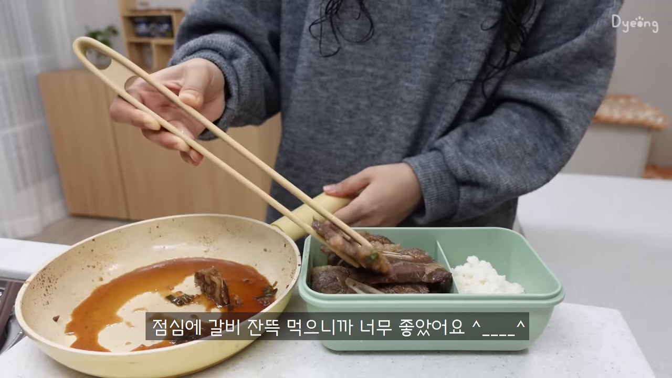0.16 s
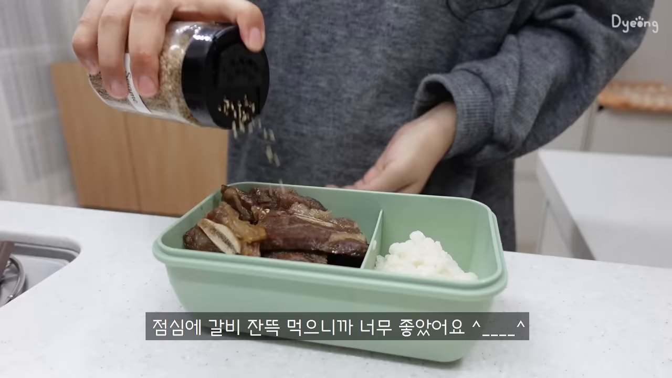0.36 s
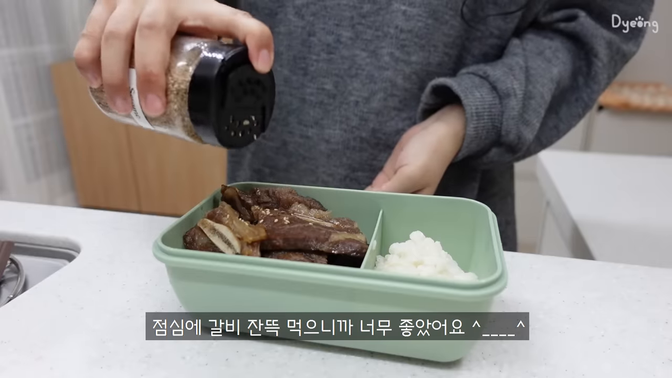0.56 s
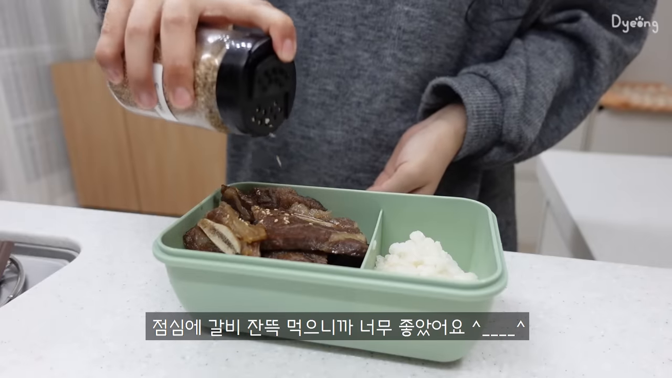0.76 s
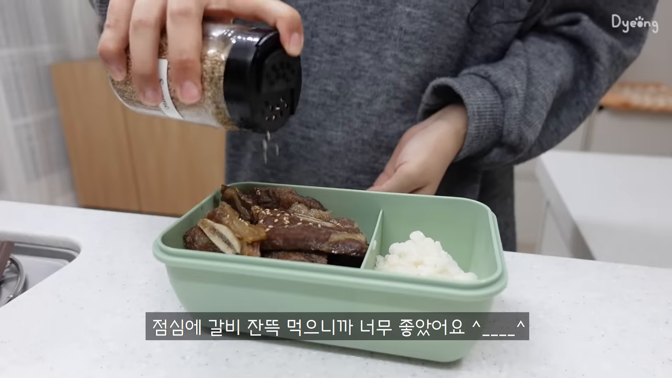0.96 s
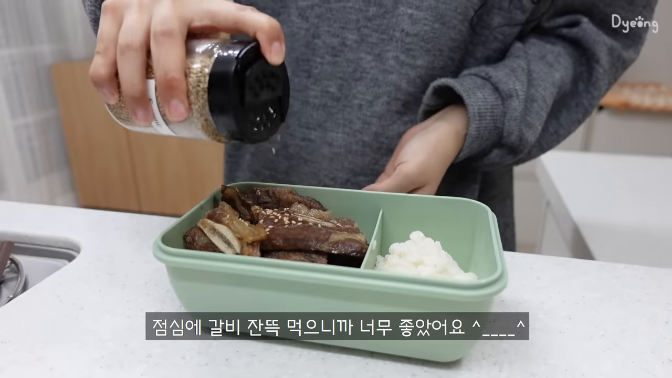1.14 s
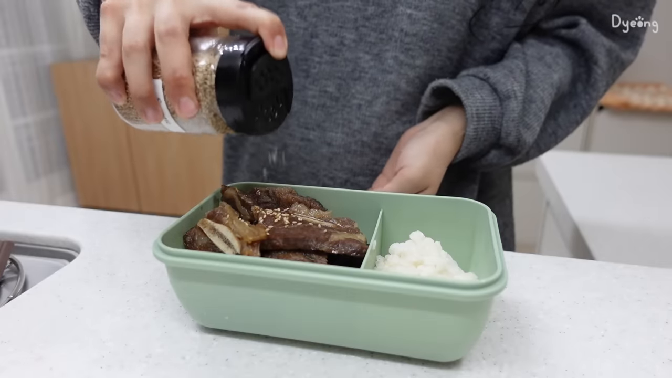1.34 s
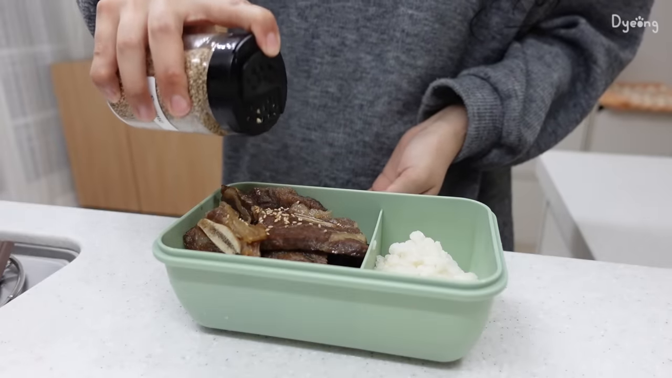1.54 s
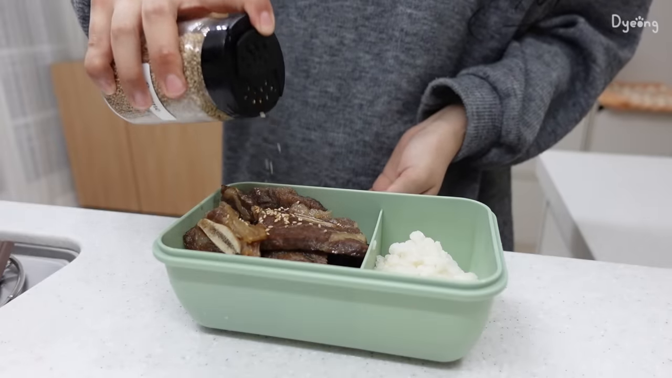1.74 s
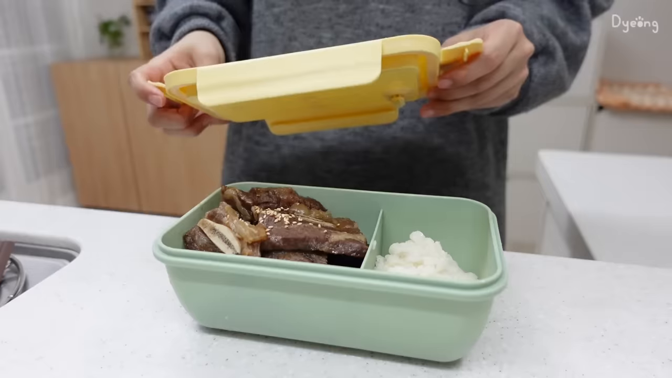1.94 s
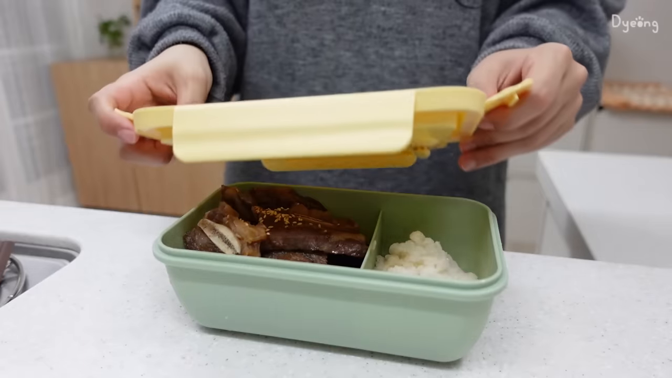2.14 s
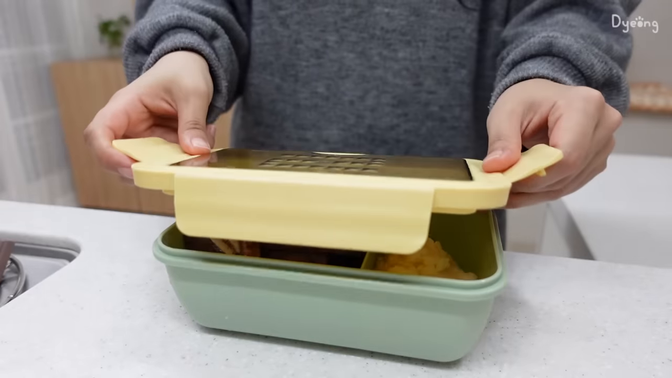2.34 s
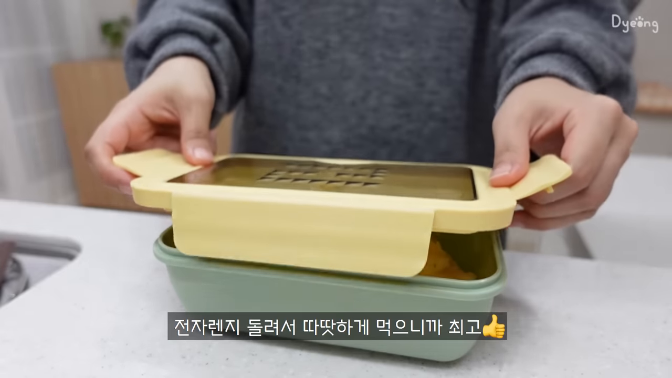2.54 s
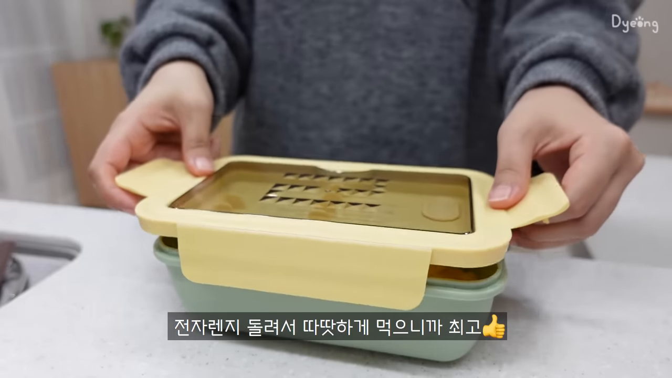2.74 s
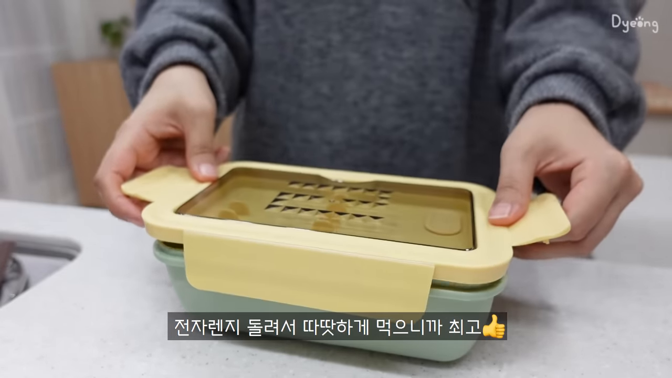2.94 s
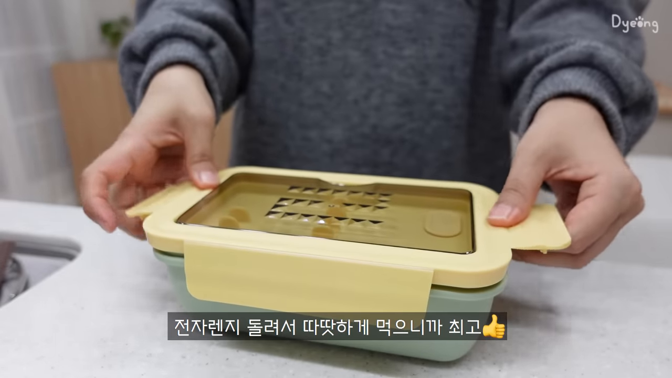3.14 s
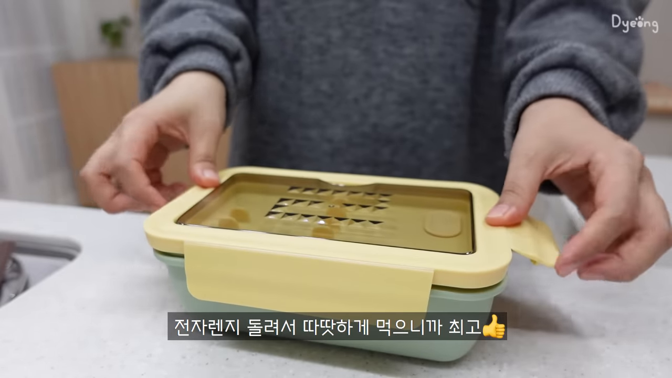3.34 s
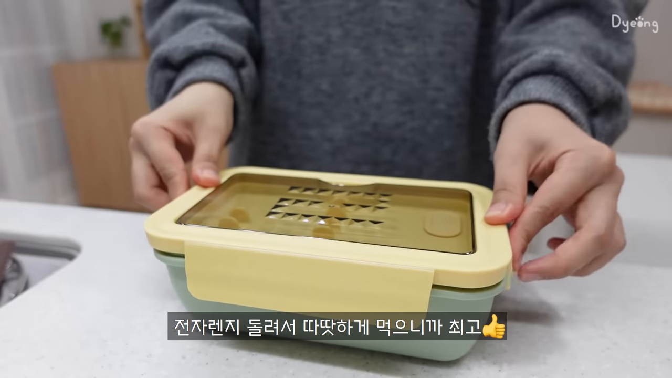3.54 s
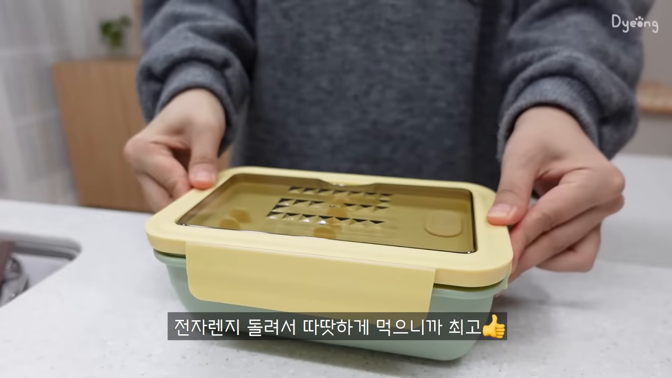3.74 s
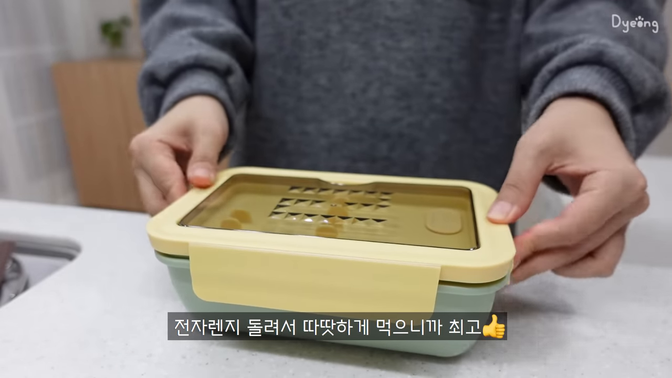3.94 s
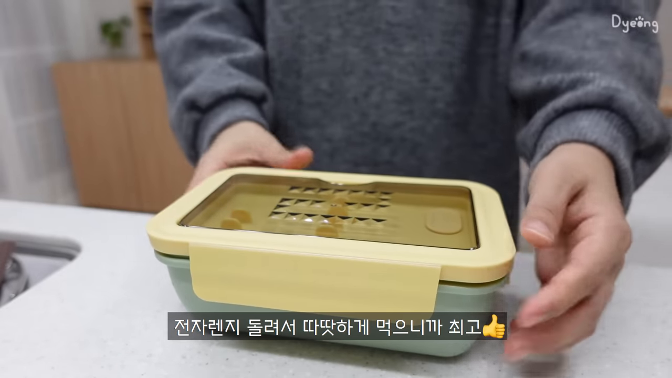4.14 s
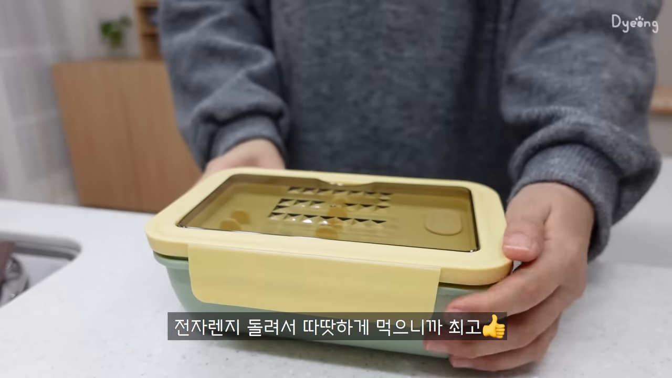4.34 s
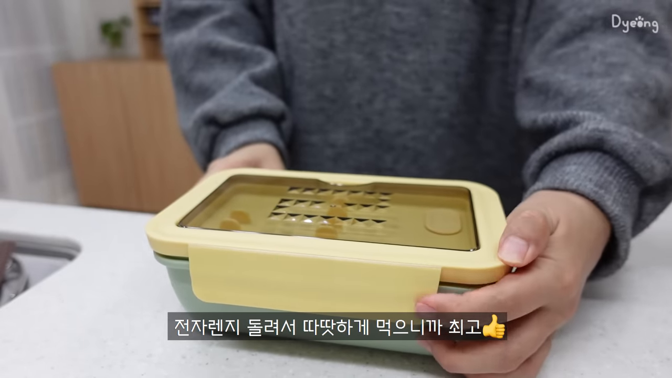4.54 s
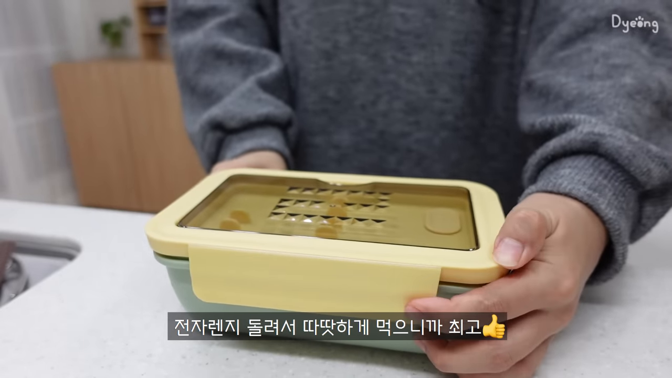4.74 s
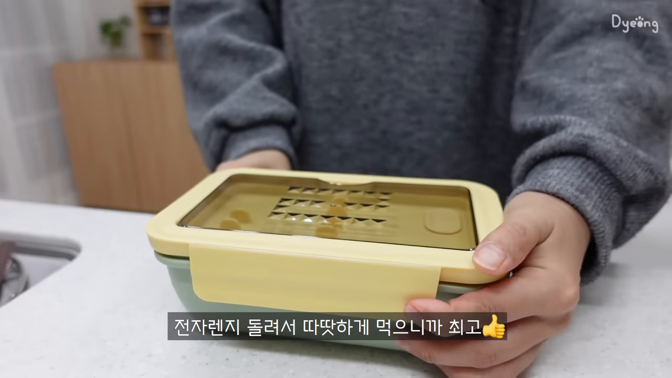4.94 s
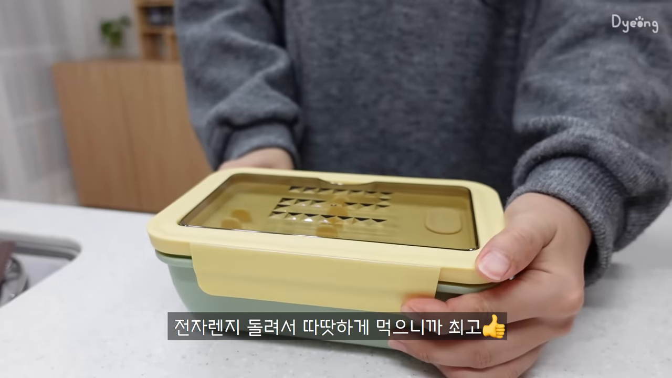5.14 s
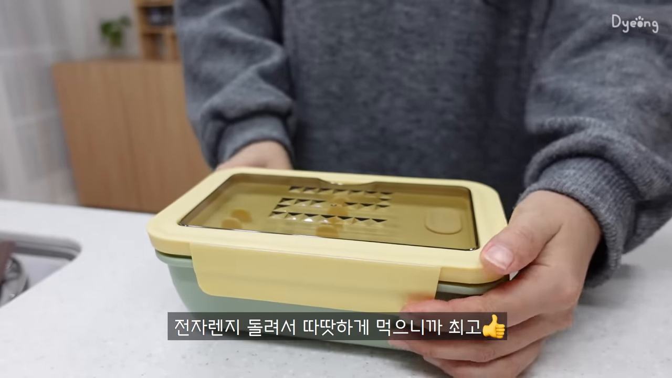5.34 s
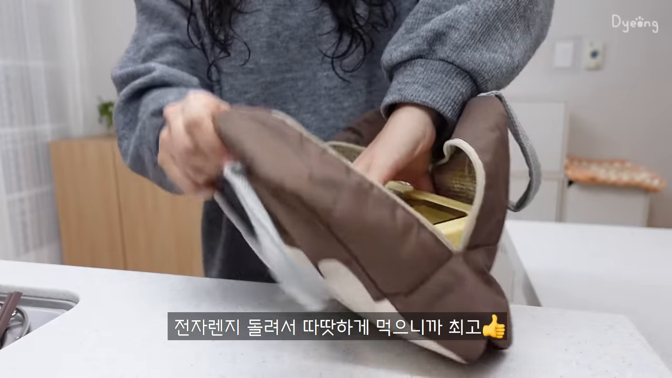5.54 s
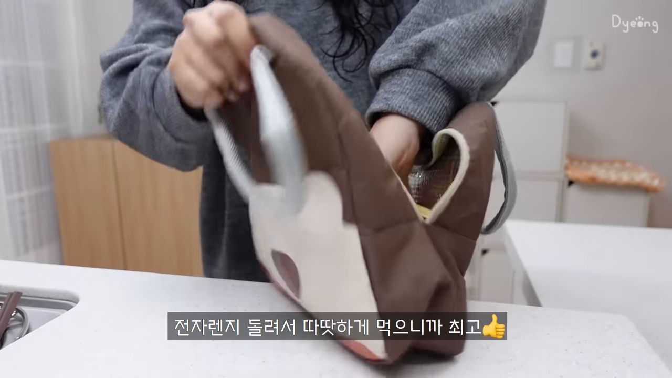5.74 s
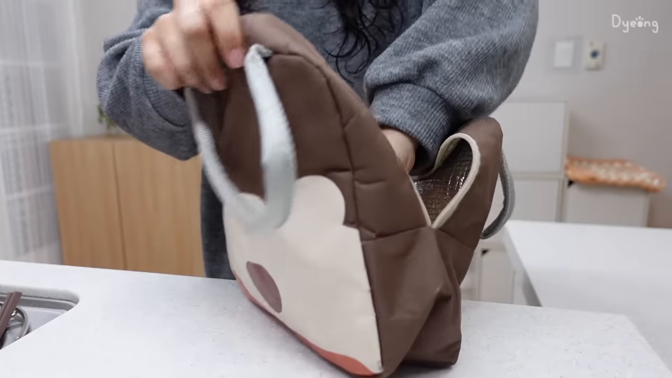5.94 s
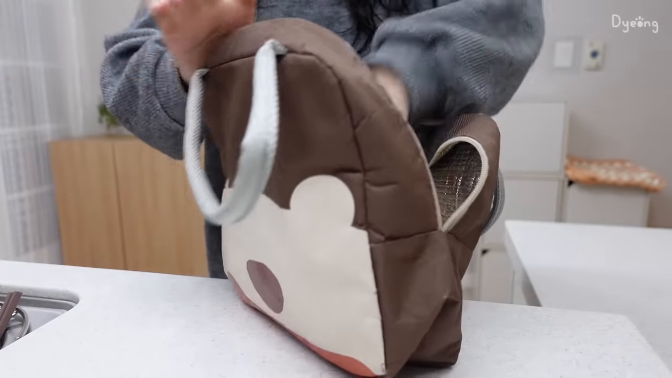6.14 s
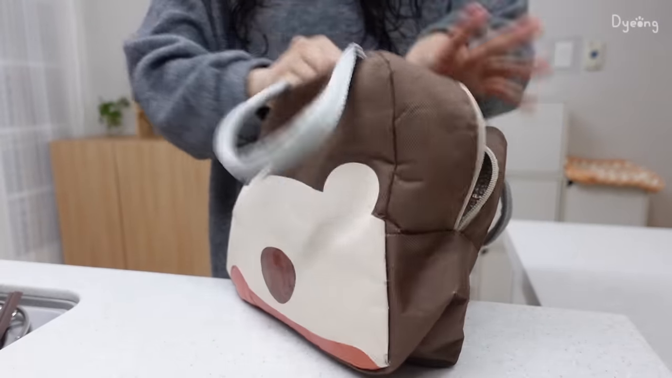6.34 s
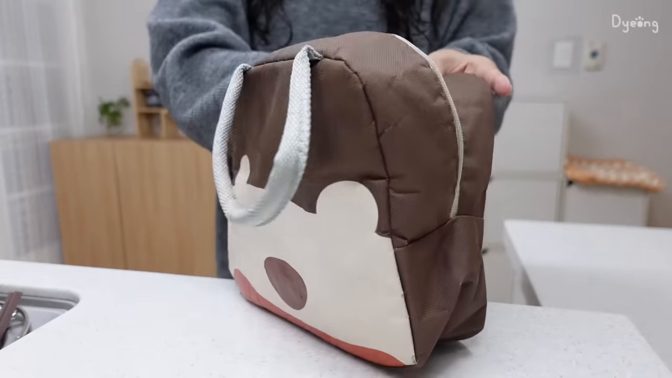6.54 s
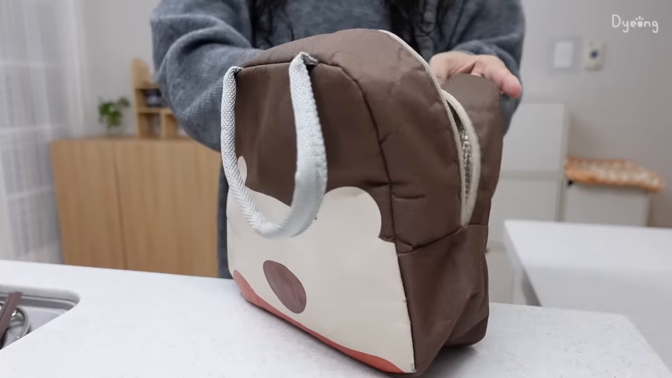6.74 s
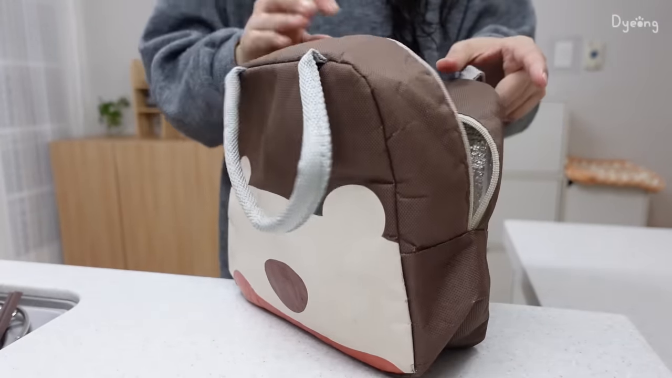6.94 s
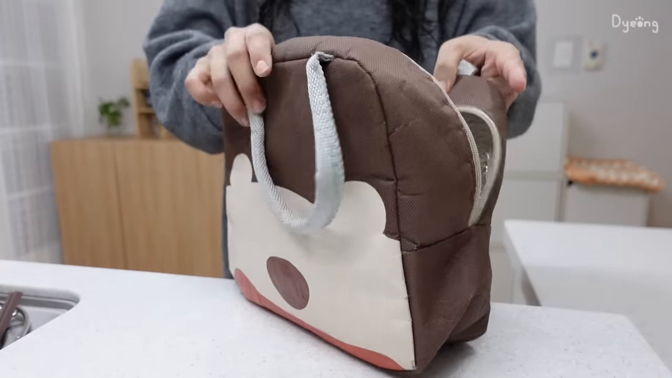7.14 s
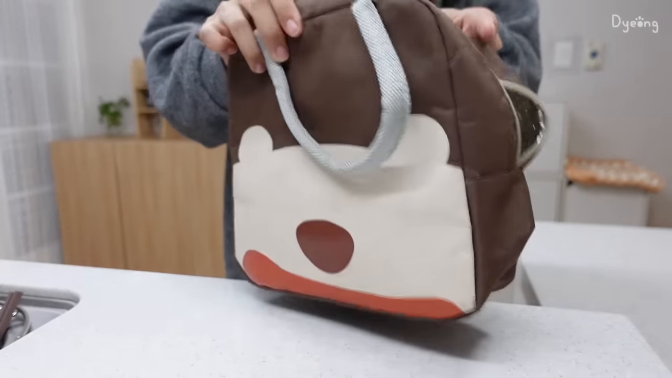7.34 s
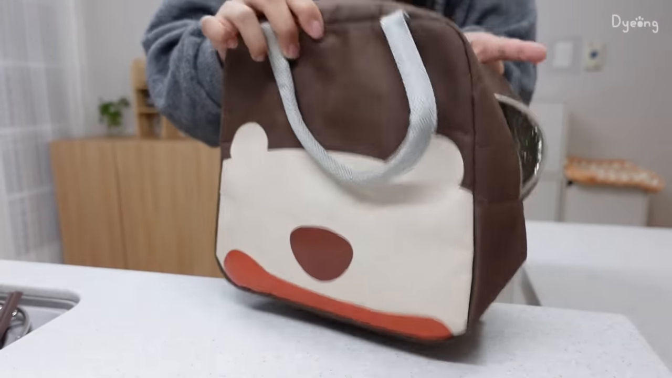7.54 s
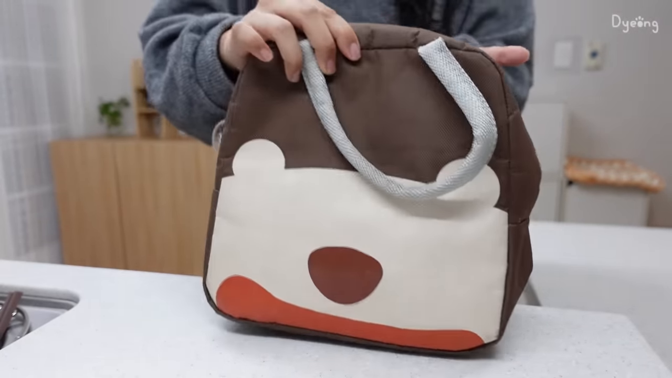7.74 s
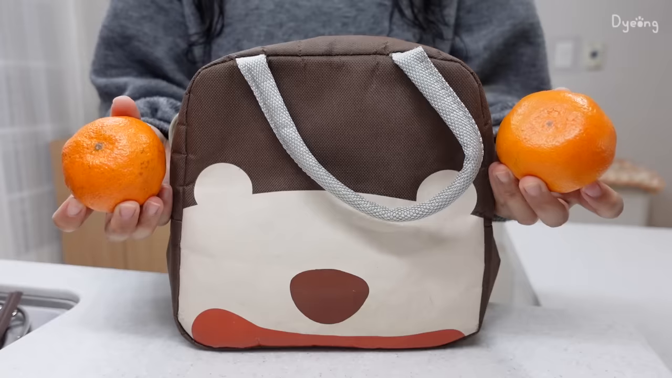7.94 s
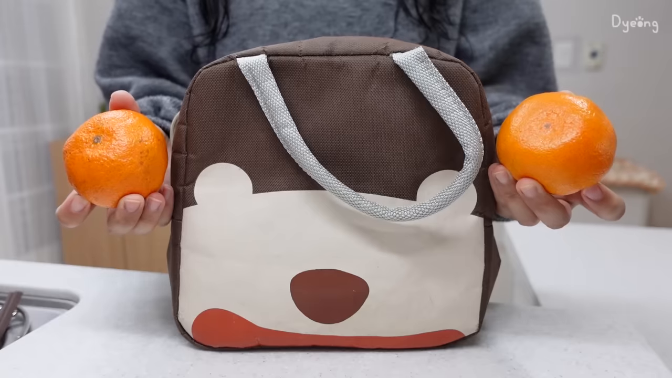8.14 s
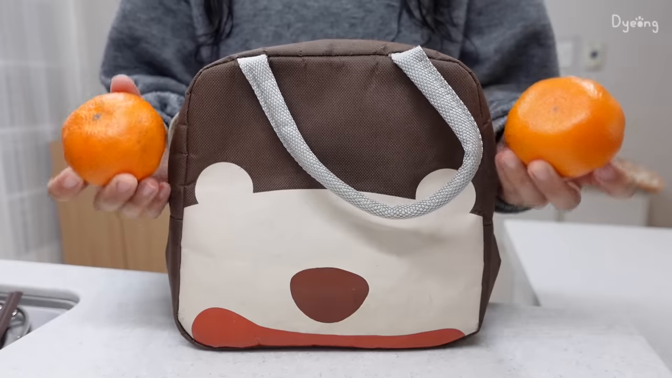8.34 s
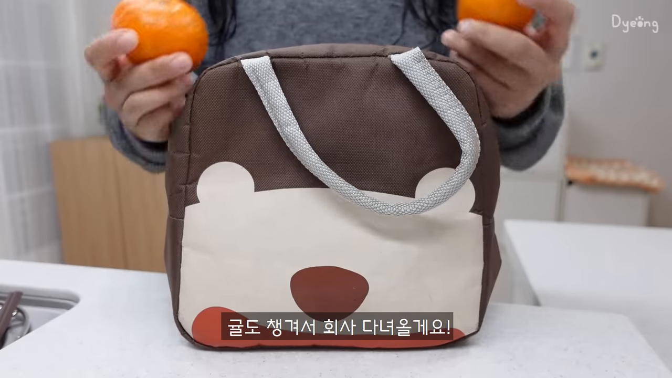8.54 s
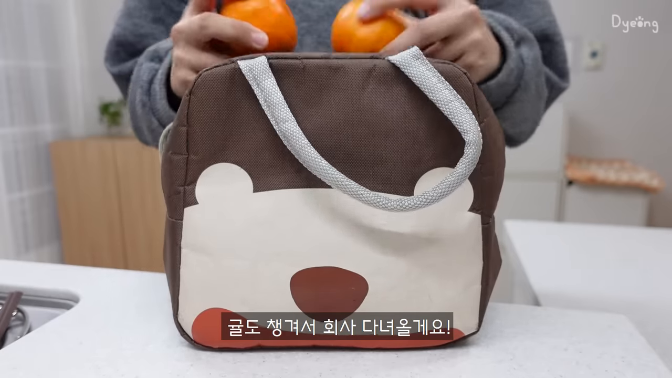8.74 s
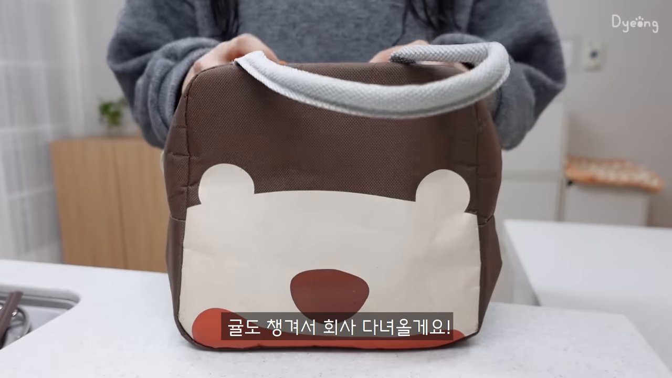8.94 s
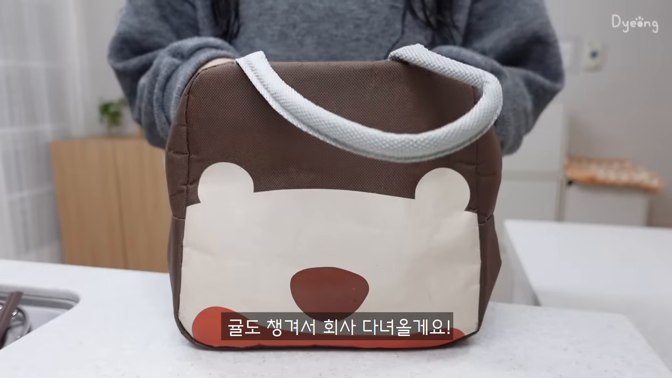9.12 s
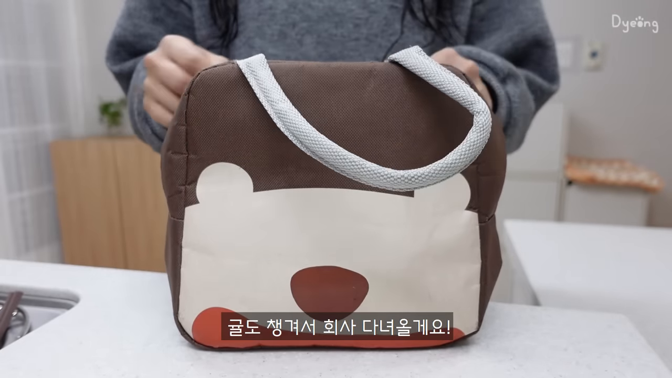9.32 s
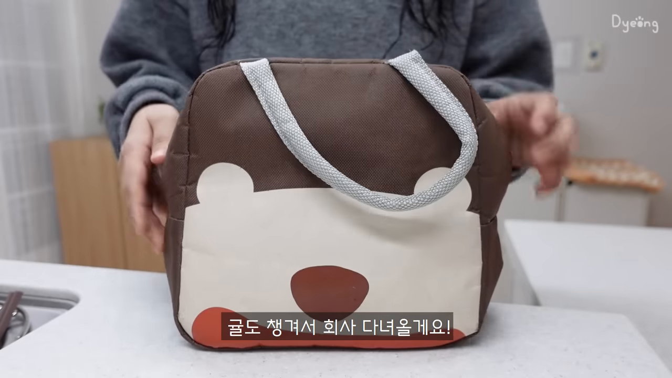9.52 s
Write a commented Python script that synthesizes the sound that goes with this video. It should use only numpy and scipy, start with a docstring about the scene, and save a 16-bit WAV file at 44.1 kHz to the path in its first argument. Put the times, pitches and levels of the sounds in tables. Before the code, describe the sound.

Close on a kitchen counter, fine seeds swish in short shakes inside a jar. A plastic lid clacks onto a lunch box, clicks and gives a tiny squeak, then three very loud latch snaps ring through the hard-walled room. A padded bag rustles and crinkles as the box shuffles inside with dull knocks; after a brief lull, fruit drops in with soft thuds. A camera microphone catches faint room tone and hiss.

```python
"""On a kitchen counter a lunch is packed: seeds are shaken from a jar, a lid is set on its box, latches snap shut.
The box goes into a padded bag that rustles, shuffles and bumps; fruit is dropped in.
Hard hits and snaps are clicks through ringing or filtered tones; seeds and bag are shaped noise, plus popping folds.
The hard-walled kitchen echoes. A camera microphone hears it all, and its limiter ducks under the latch snaps."""
import sys
import numpy as np
from scipy import signal
from scipy.fft import rfft, irfft, next_fast_len
from scipy.io import wavfile

SR = 44100
rng = np.random.default_rng(int(sys.argv[2]) if len(sys.argv) > 2 else 0)


def dump(signal):
    """Clip the signal to [-1, 1] and save it as 16-bit WAV at the path in sys.argv[1]."""
    limited = np.clip(np.atleast_2d(signal).T, -1, 1)
    pcm = np.round(limited * 32767).astype(np.int16)
    wavfile.write(sys.argv[1], SR, pcm)


N = 426888  # length of the sound in samples

# Blows on lid and box: start_s, peak_db (direct sound), strongest_hz, narrowness (dB per octave),
# bright_hz (a mode that stands out)
BOX_BLOWS = [(2.925, -35, 600, 22, 600), (2.9545, -12, 860, 4.5, 4250), (3.031, -37, 595, 25, 600),
             (3.103, -34, 622, 3, 4250), (3.192, -23, 504, 3, 4250), (3.345, -32.5, 555, 24, 6100),
             (3.509, -30, 880, 9.5, 3350), (3.548, -12, 1430, 14, 3350), (3.588, -22, 880, 14, 1800),
             (3.612, -4, 1140, 2, 6100), (3.774, -18, 1210, 13, 3350), (4.35, -23, 1060, 12.5, 3350),
             (4.444, -33.5, 1270, 7.5, 3350), (4.547, -16.5, 1540, 7.5, 4250), (4.703, -29, 2500, 4, 2500),
             (5.0575, -33, 1900, 4, 1800), (5.428, -38, 780, 25, 2500)]


def box_blows():
    """The lid and box are hit in the open, so their modes ring fairly freely."""
    return struck(BOX_BLOWS, damping=0.34, touch_db=-20.0, soft_hz=8700.0)


# Knocks of the contents through the bag: start_s, peak_db (direct sound), strongest_hz,
# narrowness (dB per octave)
BAG_KNOCKS = [(5.5765, -29, 209, 12.5), (5.62, -30, 900, 6), (5.664, -14.5, 1150, 15),
              (5.769, -24.5, 875, 15), (5.836, -30, 196, 12.5), (6.295, -22.5, 1480, 17),
              (6.304, -31, 213, 20.5), (6.808, -32.5, 900, 12), (6.866, -23, 1310, 2),
              (6.912, -31.5, 654, 7), (7.176, -27, 187, 13), (7.18, -28, 1100, 7), (7.219, -28, 595, 20),
              (7.463, -20, 910, 0), (7.564, -33, 684, 38), (7.647, -24, 740, 17), (7.670, -13.5, 610, 10.5),
              (7.668, -19.5, 128, 19), (7.683, -16, 800, 9), (7.692, -16, 895, 16), (7.701, -14, 705, 12),
              (7.712, -8.5, 706, 19), (7.766, -22, 880, 14), (9.2605, -26, 466, 2), (9.264, -15, 294, 12),
              (9.2905, -14.5, 660, 13), (9.305, -15, 2000, 17), (9.308, -15.5, 1270, 10),
              (9.312, -20, 1100, 3), (9.351, -27.5, 750, 12), (9.357, -25, 1800, 18), (9.432, -35, 550, 5),
              (9.629, -31.5, 600, 56), (9.669, -29, 600, 24)]


def bag_knocks():
    """The same box modes, damped more by the padding, with a fainter first touch."""
    return struck(BAG_KNOCKS, damping=0.28, touch_db=-52, soft_hz=8300.0)


# Ringing modes of lid and box: pitch_hz, level_db, fade_s (for 60 dB, before damping)
BOX_MODES = [(137, -21, 0.18), (228, -5.5, 0.05), (290, -5, 0.062), (456, -5, 0.082), (595, -2, 0.054),
             (787, -8, 0.12), (947, -1.5, 0.04), (1310, -6, 0.073), (1578, 2, 0.04), (1757, 15.5, 0.0053),
             (2500, 17.5, 0.0033), (3350, 16, 0.0057), (4250, 9.5, 0.0061), (6100, 0.5, 0.017),
             (7660, 5, 0.0072), (10000, 8, 0.004)]


def struck(events, damping, touch_db, soft_hz):
    """A light touch, then the blow 2 ms later, rings the modes near its strongest pitch; weak blows are duller."""
    bright_boost_db, bright_width_octaves = 6.5, 0.39
    hardening = 0.23  # dB of treble cutoff gained per dB of blow
    out, size = np.zeros(N + SR), SR // 5
    contact = np.zeros(size)
    contact[[0, SR // 500]] = amp(touch_db), 1
    # neighbouring modes start in opposite directions
    modes = radiated([(-1) ** k * ring(contact, hz, fade_s * damping)
                      for k, (hz, _, fade_s) in enumerate(BOX_MODES)])
    mode_hz, mode_db, _ = np.transpose(BOX_MODES)
    chances = rng.standard_normal((len(events), len(BOX_MODES)))
    for (start_s, peak_db, strongest_hz, narrowness, *bright_hz), chance in zip(events, chances):
        bright_db = sum(bright_boost_db * np.exp(-(np.log2(mode_hz / hz) / bright_width_octaves) ** 2)
                        for hz in bright_hz)
        distance_db = max(narrowness, 1) * abs(np.log2(mode_hz / strongest_hz))
        blow = amp(mode_db + bright_db - distance_db + 1.4 * chance) @ modes
        cutoff_hz = min(soft_hz * amp(hardening * peak_db), 20000)
        blow = signal.sosfilt(signal.butter(3, cutoff_hz, fs=SR, output="sos"), blow)
        at = round(start_s * SR)
        out[at:at + size] += amp(peak_db) * blow / np.abs(blow).max()
    return out[:N]


# Latches snapping home: start_s, peak_db (before the deep bass is removed)
LATCH_SNAPS = [(3.781, 21.5), (4.713, 17.5), (5.062, 28.5)]
# What each latch tab and its side of the lid send out, relative level per Hz:
# pitch_hz, first_db, second_db, third_db (one level column for each row of snaps)
LATCH_COLOURS = [(159, -21, -13, -34), (196, -13, -15.5, -28.5), (390, -7.5, -13, -17.5),
                 (600, -9, -9, -12), (818, -1.5, -6, -5.5), (984, 1, -1, -12), (1440, -1.5, -1, -6),
                 (1980, -2.5, -4.5, -8.5), (2440, -4, -8.5, -11), (2900, -5, -7, -14.5),
                 (4120, -8.5, -7, -9), (5400, -10, -15, -14), (7520, -19, -24.5, -17),
                 (15400, -35, -42.5, -41.5)]


def latches():
    """The parts of a latch let go one after another, so each pitch region of the click has its own delay."""
    spread_ms, lead, regions = 2.59, 200, 40  # lead in samples
    out, size = np.zeros(N + SR), 2048
    bins = np.arange(size // 2 + 1)
    pitch_hz, *voices_db = np.transpose(LATCH_COLOURS)
    chances = rng.random((len(LATCH_SNAPS), regions))
    for (start_s, peak_db), voice_db, chance in zip(LATCH_SNAPS, voices_db, chances):
        delay = np.interp(bins, np.linspace(0, size // 2, regions), chance ** 2)
        delay = SR / 1000 * spread_ms * delay + lead
        # adding up the delays over pitch gives the phase that makes them
        click = irfft(np.exp(-2j * np.pi * np.cumsum(delay) / size), size)
        snap = colour(click, np.transpose([pitch_hz, voice_db]))
        at = round(start_s * SR) - lead
        out[at:at + size] += amp(peak_db) * snap / np.abs(snap).max()
    return radiated(out[:N])


# Hands, lid and bag rub on the box: peak_s, level_db (before the deep bass is removed), strongest_hz,
# rise_ms, fall_ms (per 20 dB, at least 1)
BOX_RUBS = [(2.453, -47, 880, 19, 41), (2.46, -52.5, 2820, 33, 29), (2.935, -45, 294, 13, 60),
            (3.065, -39, 670, 10, 117), (3.085, -48, 3600, 35, 44), (3.12, -58, 149, 30, 151),
            (3.238, -53.5, 134, 110, 117), (3.4, -58, 600, 193, 124), (3.607, -35.5, 980, 4, 9),
            (4.055, -44.5, 1030, 18, 23), (4.061, -41, 4500, 16, 8), (4.197, -49.5, 7140, 4, 23),
            (4.47, -56.5, 146, 255, 299), (4.98, -48.5, 1410, 158, 300), (5.461, -36.5, 3030, -3, 386),
            (6.6, -35, 1360, 132, 137), (7.77, -36, 890, 87, 29), (7.927, -30, 4200, -4, 8)]


def rubbing():
    """Dense uneven slips excite the box modes around the strongest pitch of each rub."""
    longest_cycles = 30  # limit on a mode's fade
    peak_s, rub_db, strongest_hz, rise_ms, fall_ms = np.transpose(BOX_RUBS)
    mode_hz, mode_db, fade_s = np.transpose(BOX_MODES)
    share_db = mode_db[:, None] - 22.4 * abs(np.log2(mode_hz[:, None] / strongest_hz))
    # the shares of one rub add up to its level in power
    share_db = share_db - 10 * np.log10(np.sum(amp(share_db) ** 2, axis=0))
    gains = blend(rub_db + share_db, list(map(swell, peak_s, rise_ms, fall_ms)))
    slips = rng.standard_normal(N) * amp(2.2 * np.minimum(rng.exponential(1, N), 3.5))
    voices = (rms_one(ring(slips, hz, min(fade * 0.84, longest_cycles / hz)))
              for hz, fade in zip(mode_hz, fade_s))
    return radiated(sum(gain * voice for gain, voice in zip(gains, voices)))


# Loudness of the squeaking lid seal: time_s, level_db
SQUEAK_CURVE = [(3.36, -63), (3.378, -50), (3.398, -47.5), (3.41, -67), (3.47, -61), (3.485, -82)]
# Ringing modes of the seal: pitch_hz, level_db (relative), fade_s (for 60 dB)
SEAL_MODES = [(3280, 3, 0.023), (6300, -8.5, 0.0052)]


def squeak():
    """The seal sticks and slips: noise heard through narrow resonances."""
    is_on, level_db = in_time(SQUEAK_CURVE)
    voices = [amp(db) * rms_one(ring(rng.standard_normal(N), hz, fade_s)) for hz, db, fade_s in SEAL_MODES]
    return is_on * amp(level_db) * sum(voices)


# Tones of the counter top: pitch_hz, level_db (against what drives it), fade_s (for 60 dB)
COUNTER_MODES = [(137.9, -52.5, 0.24), (204.9, -55.5, 0.4), (388.5, -57.5, 0.26)]


def counter_ring(work):
    """The counter top rings on under every blow."""
    return sum(amp(db) * ring(work, hz, fade_s) for hz, db, fade_s in COUNTER_MODES)


# The hands move the bag: peak_s, rise_ms, fall_ms (per 20 dB, at least 1),
# swish_db (cloth), crinkle_db (lining), shuffle_db (contents)
BAG_MOVES = [(5.46, -5, 501, -32.5, -54, -81), (5.54, 150, 301, -41, -39, -61),
             (5.817, 332, 198, -35, -35, -42.5), (6.02, 402, 346, -39.5, -42.5, -51.5),
             (6.17, 204, 298, -46.5, -54, -52), (6.3, 16, 520, -34.5, -44.5, -45),
             (6.532, 11, 174, -36.5, -33.5, -38), (6.628, 192, 110, -32, -35, -38.5),
             (6.805, 61, 304, -42.5, -48, -51), (6.86, 109, 400, -40, -52, -51.5),
             (7.0, 100, 207, -43.5, -73, -66), (7.185, 63, 365, -35.5, -44, -43),
             (7.257, 205, 59, -34.5, -41, -53), (7.4, 191, 300, -42.5, -82, -49.5),
             (7.477, 45, 164, -32, -38, -38.5), (7.665, 117, 190, -35, -35.5, -58),
             (7.695, 51, 75, -54, -31, -22), (7.85, 132, 899, -39, -47.5, -46),
             (8.487, 31, 194, -45.5, -49, -56.5), (8.603, 75, 21, -44, -51, -54),
             (8.79, 16, 500, -48, -72, -60), (8.92, 199, 600, -42, -46.5, -54.5),
             (9.306, 48, 102, -45, -38.5, -34), (9.55, 313, 300, -45.5, -51.5, -49.5),
             (9.68, 35, 100, -42, -43, -41)]
# Colour of each part's noise: pitch_hz, level_db (relative, per Hz)
CLOTH_COLOUR = [(1500, -18), (2500, -7.5), (4000, -3), (6000, -2), (9000, -4), (12000, -8), (16000, -14.5)]
LINING_COLOUR = [(600, -14), (1000, -4), (1400, 4.5), (2200, 2.5), (3500, 0.5)]
CONTENTS_COLOUR = [(200, -2.5), (350, -9), (620, -0.5), (900, -4.5), (1400, -7.5)]
COUNTER_COLOUR = [(60, -4), (100, -5.5), (125, 7), (160, -31), (200, -2.5), (280, 3), (450, -33)]


def bag():
    """Cloth, lining, contents and counter each answer the hands with noise of their own colour."""
    stop_s = 7.975  # swells that peak before this time stop abruptly here
    counter_under_contents_db, creases_under_cloth_db = -8, -17.5
    voices = [texture(CLOTH_COLOUR, grain_db=2.5, flicker_db=1.5, flicker_rate=65.0),
              texture(LINING_COLOUR, grain_db=-2.5, flicker_db=2.0, flicker_rate=68.0),
              texture(CONTENTS_COLOUR, grain_db=3.5, flicker_db=4.0, flicker_rate=26.0),
              texture(COUNTER_COLOUR, grain_db=0.5, flicker_db=4.5, flicker_rate=34.0)]
    is_after_stop = np.arange(0, N, 20) / SR > stop_s
    swells = [swell(peak_s, rise_ms, fall_ms) * ~(is_after_stop & (peak_s < stop_s))
              for peak_s, rise_ms, fall_ms, *_ in BAG_MOVES]
    *_, swish_db, crinkle_db, shuffle_db = np.transpose(BAG_MOVES)
    # the counter rumbles with the weight that shifts on it
    rumble_db = shuffle_db + counter_under_contents_db
    gains = blend([swish_db, crinkle_db, shuffle_db, rumble_db], swells)
    rustle = sum(gain * voice for gain, voice in zip(gains, voices))
    return rustle + amp(creases_under_cloth_db) * gains[0] * creases()


def creases():
    """Fabric folds pop at random in clumps, each ringing briefly at one of twenty pitches; average level (rms) 1."""
    pops_per_s, ring_cycles = 330, 7.7  # rate before clumping; cycles to fade 60 dB
    sizes = amp(5.0 * np.minimum(rng.exponential(1, N), 4)) * rng.choice([-1, 1], N)
    pops = sizes * (rng.random(N) < pops_per_s * amp(4.0 * drift(30)) / SR)
    pitch_number = rng.integers(0, 20, N)
    return rms_one(sum(ring(pops * (pitch_number == k), hz, ring_cycles / hz)
                       for k, hz in enumerate(np.geomspace(1100, 7000, 20))))


# Seeds slosh against the jar wall: peak_s, level_db, fall_ms (per 20 dB)
SEED_SLOSHES = [(.426, -44.5, 110), (0.754, -42, 72), (0.796, -41.5, 122), (.995, -55.5, 46),
                (1.095, -43.5, 76), (1.124, -43.5, 59), (1.24, -58, 80), (1.38, -55.5, 72),
                (1.478, -46, 80), (1.524, -40.5, 50), (1.57, -54, 198), (1.63, -55, 57), (1.724, -50.5, 82),
                (1.764, -53, 53), (1.845, -57.5, 100), (1.882, -53.5, 23)]
# Colour of the seed noise: pitch_hz, level_db (relative, per Hz)
SEED_COLOUR = [(880, -48), (1740, -22), (2640, -16.5), (5490, -8.5), (8500, -10.5), (13800, -19.5),
               (16000, -24)]


def seeds():
    """Grainy noise stands for the many tiny impacts on the jar wall, swelling and dying with each slosh."""
    shaking_from_s, rise_ms = 0.424, 33  # rise per 20 dB
    swells = [swell(peak_s, rise_ms, fall_ms) for peak_s, _, fall_ms in SEED_SLOSHES]
    level, = blend([[db for _, db, _ in SEED_SLOSHES]], swells)
    is_on = np.arange(N) / SR > shaking_from_s
    return level * is_on * texture(SEED_COLOUR, grain_db=3.0, flicker_db=1.5, flicker_rate=100.0)


# Echo of the hard-walled kitchen by pitch band: pitch_hz, fade_s (for 60 dB), level_db (relative)
ECHO_BANDS = [(126, 0.33, -26), (250, 0.3, 4), (514, 0.49, 3), (990, 0.46, -1.5), (2060, 0.35, -3),
              (3470, 0.17, 5.5), (7420, 0.43, 0.5), (13200, 0.34, 5.5)]


def kitchen(x):
    """Reflections as noise that builds up in about a millisecond and dies band by band."""
    rough_db = 1  # walls and cupboards return the sound in clumps
    t = np.arange(SR) / SR
    noise, tail = rng.standard_normal((len(ECHO_BANDS), 2, SR)), 0
    for k, (hz, fade_s, db) in enumerate(ECHO_BANDS):
        band = signal.butter(3, [hz / 1.55, min(hz * 1.55, 19000)], "band", fs=SR, output="sos")
        tail = tail + amp(db - 60 * t / fade_s) * signal.sosfilt(band, noise[k])
    tail *= (1 - np.exp(-t / 0.00027)) * amp(rough_db * drift(138.8)[:SR])
    tail /= np.sqrt(np.sum(tail[0] ** 2))
    mid, side = signal.fftconvolve(tail, x[None], axes=1)[:, :N]
    return stereo(mid, side, wide_db=4.5)


# Kitchen background, steady until the next step in level: start_s, tone_db, hiss_db
BACKGROUND_LEVELS = [(0, -61, -70), (.424, -60, -64), (1.95, -60, -68), (2.92, -56, -64.5),
                     (5.06, -55, -81), (5.458, -55, -92), (7.975, -55.5, -66), (8.8, -55, -52.5)]
# Colours of room tone and treble hiss: pitch_hz, level_db (relative, per Hz)
TONE_COLOUR = [(25, -46), (60, -13.5), (125, 1), (250, 2), (600, -1), (1200, -3.5), (2100, -5), (3400, -16),
               (6000, -20.5)]
HISS_COLOUR = [(1500, -32), (3000, -4.5), (6000, -6), (10000, -7.5), (16000, -13.5)]
# A low appliance hum: time_s, level_db (before it wavers)
HUM_CURVE = [(7.975, -65), (8.45, -65), (8.55, -58.5), (9.36, -58), (9.41, -77), (9.55, -59), (9.68, -61)]


def background():
    """Room tone and microphone hiss are coloured noise; the hum is one low sine that wavers in level."""
    hum_hz = 54.6
    t = np.arange(N) / SR
    start_s, tone_db, hiss_db = np.transpose(BACKGROUND_LEVELS)
    stretch = np.maximum(np.searchsorted(start_s, t, "right") - 1, 0)
    is_on, hum_db = in_time(HUM_CURVE)
    hum = is_on * amp(hum_db + 2.0 * drift(6)) * np.sqrt(2) * np.sin(2 * np.pi * hum_hz * t)
    room_tone = amp(tone_db[stretch]) * texture(TONE_COLOUR, flicker_db=1.5, wide_db=13.0)
    hiss = amp(hiss_db[stretch]) * texture(HISS_COLOUR, wide_db=2.5)
    return room_tone + hiss + hum


def amp(db):
    """Turn decibels into a plain gain."""
    return 10 ** (np.asarray(db) / 20)


def rms_one(x):
    """Scale to an average level (rms) of 1."""
    return x / np.sqrt(np.mean(x ** 2) + 1e-20)


def in_time(rows):
    """A gate that is open over the table's span, then its columns, sample by sample."""
    time_s, *columns = np.transpose(rows)
    t = np.arange(N) / SR
    is_on = (t >= time_s[0]) & (t <= time_s[-1])
    return [is_on] + [np.interp(t, time_s, column) for column in columns]


def colour(x, points):
    """Filter by a table of pitch_hz, level_db, falling 24 dB an octave beyond its ends."""
    length = x.shape[-1]
    size = next_fast_len(length)
    hz, db = np.transpose(points)
    octave = np.log2(np.maximum(np.arange(size // 2 + 1) * SR / size, 1))
    beyond = np.maximum(np.log2(hz[0]) - octave, 0) + np.maximum(octave - np.log2(hz[-1]), 0)
    gain = amp(np.interp(octave, np.log2(hz), db) - 24 * beyond)
    return irfft(rfft(x, size) * gain, size)[..., :length]


def drift(rate):
    """A slow random wander: straight lines between random points of spread 1, rate points per second."""
    knots = rng.standard_normal(2000)
    return np.interp(np.arange(N) / SR * rate, np.arange(2000), knots)


# Basic stereo width, before each sound's own widening: pitch_hz, side_db (side gain)
STEREO_WIDTH = [(30, -36), (125, -18), (500, -19), (2000, -18), (4500, -15), (9000, -13), (15000, -16.5)]


def stereo(mid, side, wide_db):
    """Left and right from a centre signal and an unrelated side signal."""
    # hold the end levels flat to the edges of hearing
    points = [(10, STEREO_WIDTH[0][1]), *STEREO_WIDTH, (22000, STEREO_WIDTH[-1][1])]
    side = amp(wide_db) * colour(side, points)
    return np.array([mid + side, mid - side])


def texture(spectrum, grain_db=0., flicker_db=0., flicker_rate=52.0, wide_db=0.):
    """Coloured stereo noise with uneven grains and a flickering level; average level (rms) 1."""
    grains_db = grain_db * np.minimum(rng.exponential(1, N), 6)
    sizes = amp(grains_db + flicker_db * drift(flicker_rate))
    mid, side = colour(sizes * rng.standard_normal((2, N)), spectrum)
    return rms_one(stereo(mid, side, wide_db))


def ring(x, hz, fade_s):
    """Each click in x sets off a sine that fades by 60 dB in fade_s; a unit click gives about height 1."""
    decay, turn = amp(-60 / (fade_s * SR)), 2 * np.pi * hz / SR
    return signal.lfilter([0, np.sin(turn)], [1, -2 * decay * np.cos(turn), decay * decay], x + 1e-18)


def radiated(x):
    """A small box sends out little deep bass: cut below 125 Hz."""
    return signal.sosfilt(signal.butter(3, 125, "high", fs=SR, output="sos"), x)


def swell(peak_s, rise_ms, fall_ms):
    """Gain at every 20th sample that climbs to 1 and sinks again, 20 dB per rise or fall time."""
    ms = 1000 * (np.arange(0, N, 20) / SR - peak_s)
    return amp(-20 * np.maximum(-ms / max(rise_ms, 1), ms / max(fall_ms, 1)))


def blend(levels_db, swells):
    """Overlapping swells add in power; one gain curve for each row of levels."""
    gains = np.sqrt(amp(levels_db) ** 2 @ np.square(swells))
    return np.array([np.interp(np.arange(N), np.arange(0, N, 20), gain) for gain in gains])


def scene():
    """Box sounds and padded knocks fill the kitchen with echoes; seeds, bag and background lie over them."""
    echo_db, knock_echo_db = -8.5, 2  # knock_echo_db: extra level of the knocks in the echo
    left_db = -0.26  # the hands work a little to the right
    box = box_blows() + latches() + rubbing() + squeak()
    knocks = bag_knocks()
    echo = amp(echo_db) * kitchen(box + amp(knock_echo_db) * knocks)
    work = box + knocks + counter_ring(box + knocks) + echo + seeds() + bag()
    return work * amp([[left_db], [-left_db]]) + background()


def record(dry):
    """A limiter drops the gain just after a peak and lets it climb back, so the echo swells after a snap."""
    ceiling_db, release_db_per_s, attack_s = 1, 549, 0.0001
    clip_level, clip_from_hz = 0.35, 100
    bass_cut_hz, treble_cut_hz = 42, 16600
    over_db = np.maximum(20 * np.log10(np.abs(dry).max(axis=0) + 1e-9) - ceiling_db, 0)
    climb_db = release_db_per_s * np.arange(N) / SR
    # jump up to each peak, then fall at the release speed
    held_db = np.maximum.accumulate(over_db + climb_db) - climb_db
    lag = np.exp(-1 / (attack_s * SR))
    gain = amp(-signal.lfilter([1 - lag], [1, -lag], held_db))
    low, high = (signal.butter(5, clip_from_hz, side, fs=SR, output="sos") for side in ("low", "high"))
    # what slips past is softly clipped; the deep bass is taken from the unclipped sound
    clipped = clip_level * np.tanh(dry * gain / clip_level)
    limited = gain * signal.sosfilt(low, dry) + signal.sosfilt(high, clipped)
    limited = signal.sosfilt(signal.butter(4, bass_cut_hz, "high", fs=SR, output="sos"), limited)
    return signal.sosfilt(signal.cheby2(12, 60, treble_cut_hz, fs=SR, output="sos"), limited)


dry = scene()
out = record(dry)
dump(out)
```